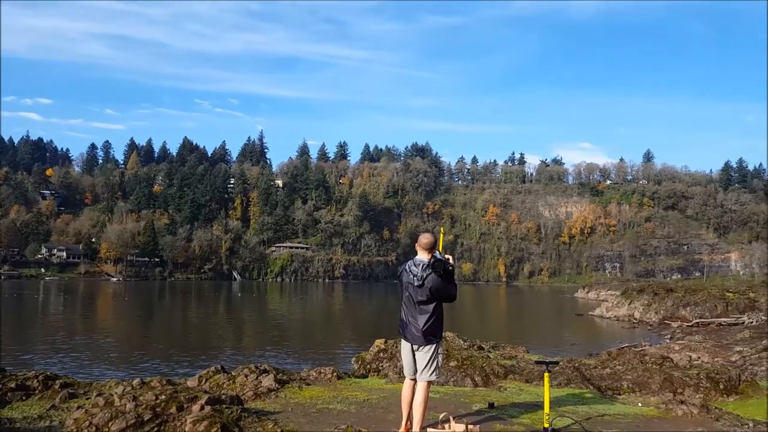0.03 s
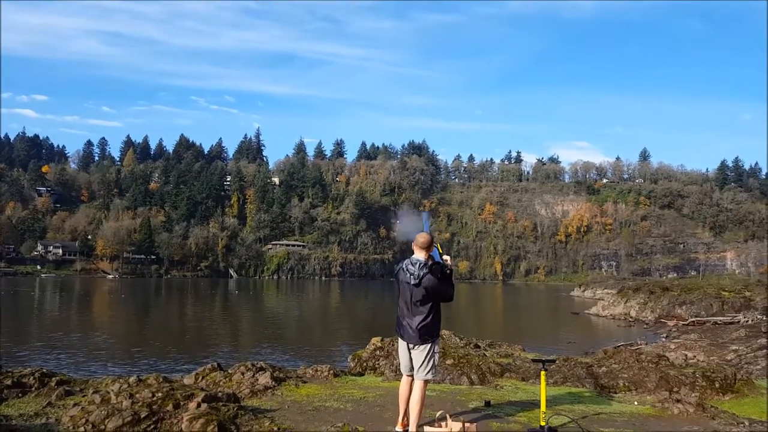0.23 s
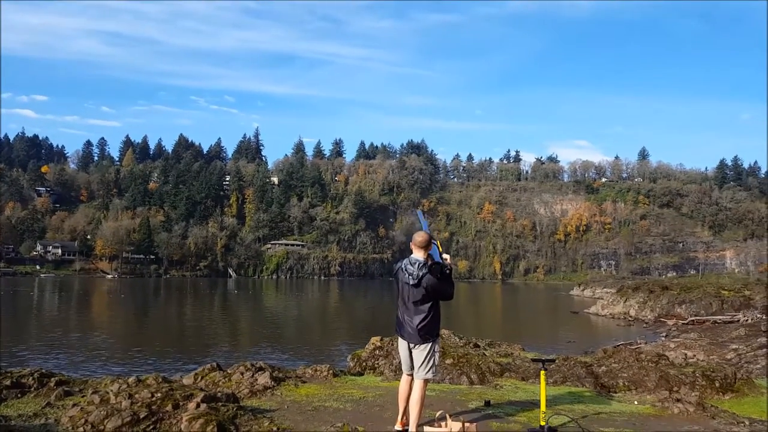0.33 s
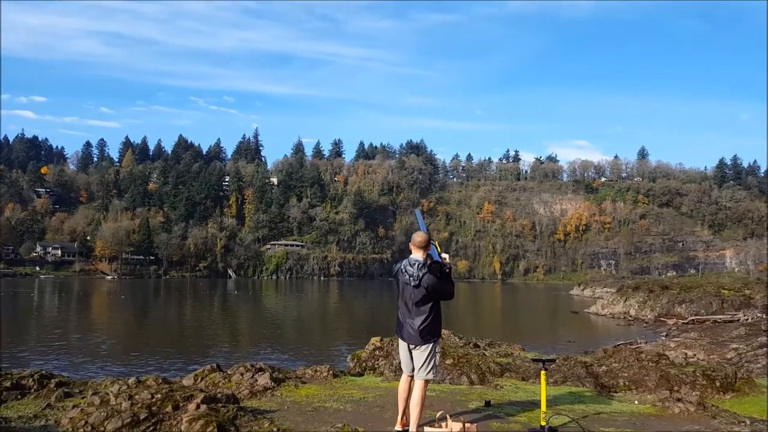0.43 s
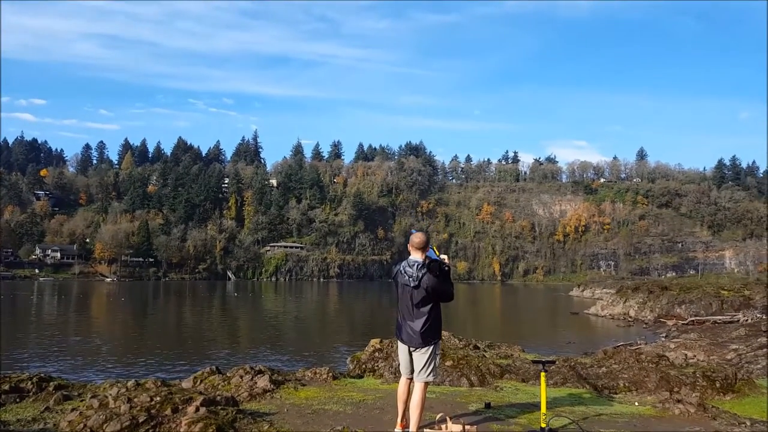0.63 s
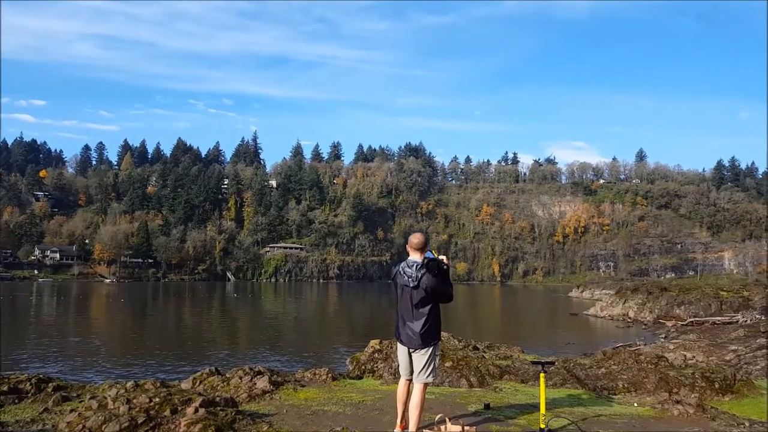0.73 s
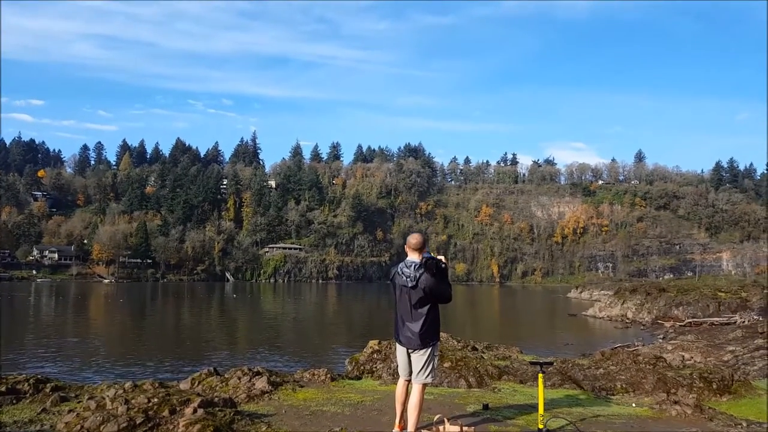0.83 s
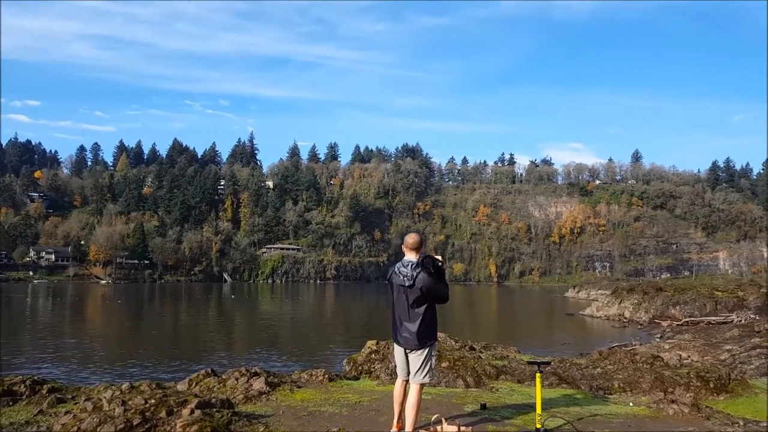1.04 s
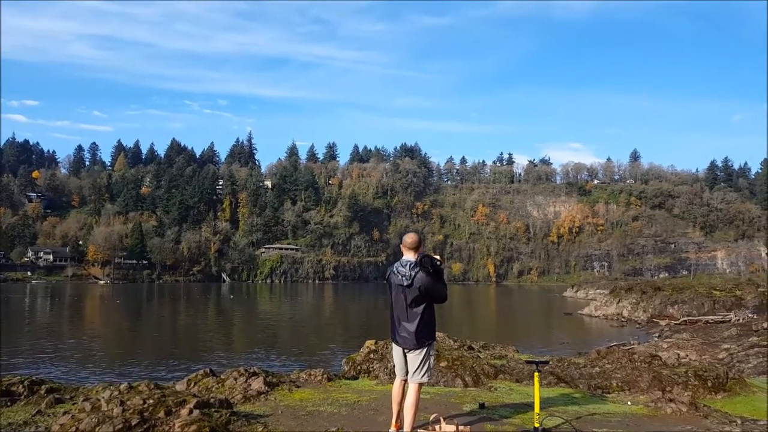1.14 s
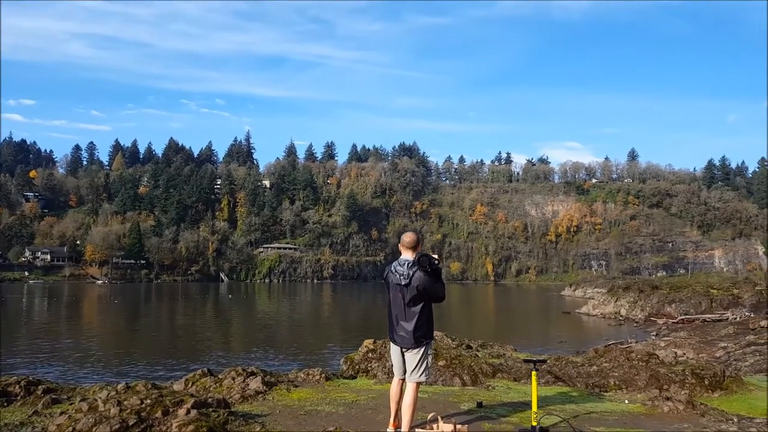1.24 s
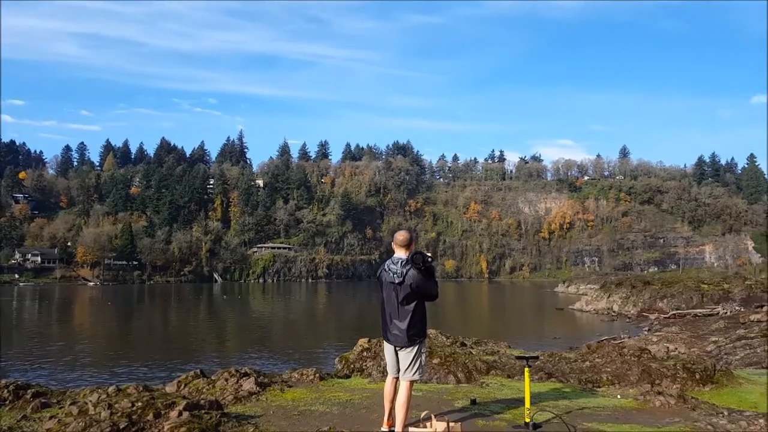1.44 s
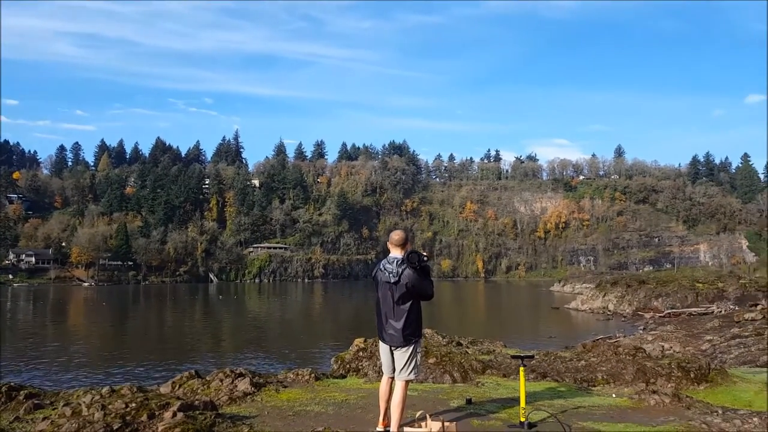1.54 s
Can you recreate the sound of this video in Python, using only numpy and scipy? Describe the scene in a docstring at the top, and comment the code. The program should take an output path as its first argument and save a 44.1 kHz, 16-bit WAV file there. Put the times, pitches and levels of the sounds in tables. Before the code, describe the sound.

A pneumatic launcher fires with a clattering pop and hissing burst, echoing off slopes over faint wind

```python
"""Wind rumble, river wash and a faint hum lie under an air cannon shot on a river bank.
The valve clacks and rattles, air rushes up the barrel, then N-shaped fronts pop at the muzzle.
Ringing pipe sines, a noise jet and buffeting die away; clipping and gain control catch the peak.
Near scatter and slope echoes follow as shaped noise while the ducked background comes back up.
Late on, faint ticks and a rustle sound close by; the rock face returns a clap and a lingering note."""
import sys
import numpy as np
from scipy import signal
from scipy.fft import rfft, irfft
from scipy.io import wavfile
from scipy.ndimage import uniform_filter1d, minimum_filter1d

SR = 44100
rng = np.random.default_rng(int(sys.argv[2]) if len(sys.argv) > 2 else 0)


def file_out(sig):
    """Save sig as 16-bit WAV at sys.argv[1]."""
    # one column per channel
    cols = np.atleast_2d(sig).T
    # limit, then scale
    lim = np.clip(cols, -1, 1)
    pcm = np.round(lim * 32767).astype(np.int16)
    wavfile.write(sys.argv[1], SR, pcm)


N = 70560  # samples, 1.6 s

VALVE_S, MUZZLE_S = 0.1952, 0.2555
# left over right
VALVE_PAN_DB, RUSH_PAN_DB, NEAR_PAN_DB = -1, -1, -1
FAR_PAN_DB, TICK_PAN_DB, AIR_PAN_DB = -1.9, -10, -3


def amp(db):
    """Decibels to amplitude ratio."""
    return 10 ** (np.asarray(db) / 20)


def clock():
    """Sample times in seconds."""
    return np.arange(N) / SR


def bins():
    """Spectrum bin frequencies in Hz, at least 1."""
    return np.maximum(np.arange(N // 2 + 1) * SR / N, 1)


def along_hz(points):
    """A table joined by straight lines on a log-frequency axis."""
    hz, value = np.array(points).T
    return np.interp(np.log(bins()), np.log(hz), value)


def octaves(points):
    """Gain that gives white noise these levels per octave, falling away beyond the ends."""
    f = bins()
    low_end = np.minimum(f / points[0][0], 1) ** 2
    high_end = np.minimum(points[-1][0] / f, 1) ** 2
    per_octave = np.sqrt(SR / 2 / f / np.log(2))
    return amp(along_hz(points)) * low_end * high_end * per_octave


def resonances(modes):
    """Gain of a set of resonances with steep skirts, at unit power."""
    f = bins()
    power = sum(amp(db) ** 2 / (1 + ((f - hz) / width_hz) ** 2) ** 2 for hz, width_hz, db in modes)
    return np.sqrt(power / power.mean())


# stereo width before spread: f/Hz, side over mid/ratio
STEREO_WIDTH = [(31, 0.13), (255, 0.15), (710, 0.42), (1410, 0.96), (2650, 0.81), (5050, 0.82)]


def noise(gain, spread=1):
    """Stereo noise of a given colour, alike in the bass and wide in the treble."""
    mid, side = np.sqrt(N) * np.exp(2j * np.pi * rng.random((2, N // 2 + 1)))
    side = side * along_hz(STEREO_WIDTH) * spread
    return irfft(gain * np.array([mid + side, mid - side]), N)


def ring(modes, full_skew_hz):
    """Steady sines with chance phases, which drift apart between the ears towards the treble."""
    out = 0
    chances = rng.uniform(-np.pi, np.pi, (len(modes), 2))
    for (hz, db), (phase, skew) in zip(modes, chances):
        apart = skew * min(hz / full_skew_hz, 1) * np.array([[0.5], [-0.5]])
        out = out + amp(db) * np.sin(2 * np.pi * hz * clock() + phase + apart)
    return out


def burst(start, rise, hold, t60):
    """Linear attack, hold, exponential release; all in seconds."""
    t = clock() - start
    release = np.maximum(t - rise - hold, 0)
    return np.clip(t / rise, 0, 1) * np.exp(-np.log(1000) * release / t60)


def swell(peak, rise_t60, fall_t60):
    """Exponential growth up to a moment, then exponential decay; all in seconds."""
    t = clock() - peak
    return np.exp(-np.log(1000) * np.maximum(-t / rise_t60, t / fall_t60))


def dull(cut_hz, order=2):
    """Smooth low-pass gain."""
    return 1 / np.sqrt(1 + (bins() / cut_hz) ** (2 * order))


def walk(rate_hz):
    """Twice-smoothed chance with unit spread."""
    k = int(SR / rate_hz)
    w = uniform_filter1d(uniform_filter1d(rng.standard_normal(N), k), k)
    return w / w.std()


def pan(x, db):
    """Level offset between the channels, left over right."""
    return x * amp(np.array([[db], [-db]]) / 2)


# wind rumble before swell: f/Hz, level/(dB per octave)
WIND_BANDS = [(21, -79), (41, -64.5), (71, -48), (112, -49), (205, -52.5), (355, -60), (710, -76)]
# wind swell: t/s, level/dB
WIND_SWELL = [(0, 7.5), (.16, -1.5), (.91, 1), (1.16, 0), (1.36, 0.5), (1.59, 3)]
# distant river wash: f/Hz, level/(dB per octave)
RIVER_BANDS = [(152, -71.5), (405, -63), (710, -59.5), (1410, -62), (2700, -63.5), (3550, -74.5),
               (6050, -80), (10100, -84), (15100, -77.5)]
# far hum: f/Hz, width/Hz, relative level/dB
HUM_MODES = [(657.7, 4.2, -2), (708, 6.3, -12.5), (768, 3.8, -15.5)]
HUM_DB = -63.5


def outdoors():
    """Low wavering noise for wind, mid-band noise for the river, narrow noise bands for the hum."""
    wind_db = np.interp(clock(), *np.array(WIND_SWELL).T) + 1.3 * walk(rate_hz=18)
    wind = noise(octaves(WIND_BANDS)) * amp(wind_db)
    river = noise(octaves(RIVER_BANDS), spread=1.4) * amp(0.51 * walk(rate_hz=10))
    hum = amp(HUM_DB) * noise(resonances(HUM_MODES))
    return wind + pan(river + hum, AIR_PAN_DB)


# close ticks: t/s, level/dB
TICK_TIMES = [(1.1, -54), (1.1188, -62)]


def ticks():
    """Short bursts of resonant noise for dry ticks, a slower one for a brief rustle."""
    colour = resonances([(2600, 480, 1), (4620, 820, -18)])  # f/Hz, width/Hz, relative level/dB
    envelope = amp(-63) * burst(1.145, rise=0.012, hold=0.025, t60=0.06)  # rustle
    for start_s, db in TICK_TIMES:
        envelope = envelope + amp(db) * burst(start_s, rise=0.00071, hold=0.0021, t60=0.025)
    return noise(colour) * envelope


# wooded slopes: t/s, level/dB, rise/s, t60/s, air cut-off f/Hz
SLOPE_ECHOES = [(0.461, -47, 0.0033, 0.35, 12000), (0.57, -52, 0.0087, 0.49, 7100),
                (.66, -62, .03, .9, 10000), (1.091, -66, 0.0094, 0.38, 3550),
                (1.276, -56, 0.011, 0.25, 3050), (1.326, -53, .013, .42, 2900)]
# echo colour: f/Hz, relative level/(dB per octave)
SLOPE_BANDS = [(61, -9), (192, 1.5), (355, -7), (710, 1.5), (1060, -0.5), (1620, -0.5), (2650, 1),
               (3450, -5), (4450, 2.5), (5550, -36), (15100, -22)]
# barrel thump and brightest ring in the nearest echo: f/Hz, width/Hz, relative level/dB
FIRST_ECHO_RESONANCES = [(177, 45, 5), (850, 99, -5.5), (2490, 200, -0.5)]
FIRST_ECHO_S, FIRST_ECHO_DB = 0.463, -36


def slope_echoes():
    """Slopes smear the shot into noise bursts dulled by air; the nearest keeps the barrel's tones."""
    first = noise(resonances(FIRST_ECHO_RESONANCES))
    out = amp(FIRST_ECHO_DB) * first * burst(FIRST_ECHO_S, rise=0.0029, hold=0.016, t60=0.18)
    for start_s, db, rise_s, t60_s, cut_hz in SLOPE_ECHOES:
        smear = noise(octaves(SLOPE_BANDS) * dull(cut_hz), spread=1.8)
        out = out + amp(db) * smear * burst(start_s, rise_s, 0, t60_s)
    return out


# rock face resonances: f/Hz, relative level/dB
CLIFF_RESONANCES = [(640, -5), (790, -12.5), (1020, 0.5), (1230, -9.5), (1480, -1), (1900, 1), (2200, 0),
                    (2620, -10.5), (3180, -6), (3720, -17.5), (4200, -27)]
CLIFF_S, CLIFF_DB, CLIFF_T60_S = 1.2724, -33.5, 0.033
CLIFF_LAG_S = 0.00022  # left behind right


def cliff_echo():
    """The rock face on the right returns a short clap of sines and a lingering note of banded noise."""
    clap = ring(CLIFF_RESONANCES, full_skew_hz=9000)
    clap = clap * burst(CLIFF_S, rise=0.00071, hold=0.003, t60=CLIFF_T60_S)
    clap[0] = np.interp(clock() - CLIFF_LAG_S, clock(), clap[0])
    note = noise(resonances([(1050, 95, 0), (1300, 200, -9)]), spread=1.4)
    note = note * burst(1.282, rise=0.032, hold=0.085, t60=0.16)
    return amp(CLIFF_DB) * clap + amp(-53) * note


# rocks and trees before grain: f/Hz, level/(dB per octave)
SCATTER_BANDS = [(41, -53.5), (92, -51.5), (205, -34.5), (355, -41.5), (810, -41), (1510, -44), (2650, -38),
                 (3450, -48), (4650, -46.5), (6050, -47.5), (9050, -49), (15100, -60.5)]
SCATTER_SPLIT_HZ, SCATTER_T60_S, SCATTER_TREBLE_T60_S = 9300, 1.33, 1.31


def scatter():
    """Many small near-shore reflections as grainy noise; the treble fades slightly faster."""
    grainy = noise(octaves(SCATTER_BANDS), spread=1.35) * amp(1.55 * walk(rate_hz=95))
    spectrum = rfft(grainy)
    low_gain = dull(SCATTER_SPLIT_HZ)
    low = irfft(spectrum * low_gain, N)
    treble = irfft(spectrum * (1 - low_gain), N)
    low_tail = low * burst(MUZZLE_S, rise=0.034, hold=0.04, t60=SCATTER_T60_S)
    return low_tail + treble * burst(MUZZLE_S, rise=0.034, hold=0.04, t60=SCATTER_TREBLE_T60_S)


# valve clack: f/Hz, width/Hz, relative level/dB
VALVE_RESONANCES = [(1383, 420, 5), (1890, 160, 8), (2420, 110, -12), (2850, 370, -1), (4100, 200, -18),
                    (4670, 190, -6), (7100, 510, -12.5)]
# valve body: f/Hz, level/(dB per octave)
VALVE_BODY_BANDS = [(62, -38), (185, -42), (355, -31), (710, -30), (1410, -25), (2650, -23.5),
                    (4050, -33.5), (7050, -35.5), (10100, -42), (15100, -52)]
VALVE_RING_DB, VALVE_RISE_S, VALVE_HOLD_S, VALVE_T60_S = -26.5, 0.00072, 0.0052, 0.062


def valve():
    """The valve slams open and rattles the plastic chamber: resonant plus broad noise bursts."""
    rattle = amp(VALVE_RING_DB) * noise(resonances(VALVE_RESONANCES), spread=0.63)
    rattle = rattle * burst(VALVE_S, VALVE_RISE_S, VALVE_HOLD_S, VALVE_T60_S)
    body = noise(octaves(VALVE_BODY_BANDS), spread=0.75)
    return rattle + body * burst(VALVE_S, VALVE_RISE_S, hold=0.0042, t60=0.072)


# air leaking past the slug: f/Hz, level/(dB per octave)
LEAK_BANDS = [(310, -24.5), (1010, -55), (2550, -46), (4550, -31), (7050, -36.5), (9050, -38.5),
              (11100, -44), (15100, -48)]
# air driving the slug: f/Hz, level/(dB per octave)
GROWL_BANDS = [(31, -52), (82, -30.5), (205, -23.5), (405, -34), (810, -26.5), (1410, -25), (2750, -23.5),
               (3550, -43), (8100, -68)]


def barrel_rush():
    """Air hisses past the slug and growls ever louder as it drives it to the muzzle."""
    opened = np.clip((clock() - VALVE_S) / 0.03, 0, 1)
    hiss = noise(octaves(LEAK_BANDS)) * burst(VALVE_S + 0.017, rise=0.018, hold=0.012, t60=0.085)
    growl = noise(octaves(GROWL_BANDS), spread=0.61)
    growl = growl * swell(MUZZLE_S - 0.002, rise_t60=0.19, fall_t60=0.07)
    return hiss + opened * growl


# open barrel modes: f/Hz, relative starting level/dB
BARREL_MODES = [(202, -14), (265, -17.5), (390, -31), (428, -13), (671, -18.5), (702, -23), (860, -21),
                (1008, -15), (1206, -21.5), (1639, -17), (2205, -21.5), (2299, -15), (2636, -14.5),
                (2903, -30), (4460, -46)]
# turbulent jet before flutter: f/Hz, level/(dB per octave)
JET_BANDS = [(102, -49), (355, -18), (710, -18), (1410, -16), (2750, -11), (3450, -19.5), (4550, -16),
             (5550, -29.5), (8850, -21.5), (10100, -25.5), (15100, -29.5)]
# low buffeting: f/Hz, level/(dB per octave)
BUFFET_BANDS = [(21, -43), (46, -36), (82, -21), (162, -25.5), (240, -22.5), (420, -29.5), (710, -27)]
BARREL_DB, BARREL_T60_S, BARREL_HOLD_S = -0.5, 0.13, 0.016


def exhaust():
    """The emptied barrel rings while a turbulent jet and its low buffeting die away."""
    pipe = amp(BARREL_DB) * ring(BARREL_MODES, full_skew_hz=2600)
    pipe = pipe * burst(MUZZLE_S - 0.0025, rise=0.0016, hold=BARREL_HOLD_S, t60=BARREL_T60_S)
    jet = noise(octaves(JET_BANDS)) * amp(2.1 * walk(rate_hz=370))
    jet = jet * burst(MUZZLE_S - 0.0011, rise=0.0014, hold=0.015, t60=0.13)
    buffet = noise(octaves(BUFFET_BANDS))
    buffet = buffet * burst(MUZZLE_S - 0.0032, rise=0.0042, hold=0.056, t60=0.14)
    return pipe + pan(jet, db=-1) + buffet


# muzzle pop and near reflections: t/s, peak level before colour/dB
SHOCK_FRONTS = [(.2556, 9), (0.2591, 5), (0.2613, 7.5), (0.2673, -1), (0.2763, -3), (0.2788, -2)]
# shock colour: f/Hz, gain/dB
SHOCK_GAINS = [(41, -14), (205, 0.5), (1010, -0.5), (2750, 4.5), (4050, -5), (8100, 1), (15100, -24)]
SHOCK_LENGTH_S, SHOCK_LEFT_LAG_S = 0.00072, 0.000045


def shocks():
    """N-shaped fronts: pressure jumps up, falls linearly below zero and jumps back."""
    out = np.zeros((2, N))
    lag_s = np.array([[SHOCK_LEFT_LAG_S], [0]])
    for start_s, db in SHOCK_FRONTS:
        u = (clock() - start_s - lag_s) / SHOCK_LENGTH_S
        inside = (u >= 0) & (u < 1)
        out += amp(db) * (1 - 2 * u) * inside
    return irfft(rfft(out) * amp(along_hz(SHOCK_GAINS)), N)


def scene():
    """Background, reflections and cannon, each panned."""
    far = pan(scatter() + slope_echoes() + cliff_echo(), FAR_PAN_DB)
    before_pop = pan(valve(), VALVE_PAN_DB) + pan(barrel_rush(), RUSH_PAN_DB)
    shot = pan(shocks() + exhaust(), NEAR_PAN_DB)
    return outdoors() + pan(ticks(), TICK_PAN_DB) + far + before_pop + shot


AGC_TOP_DB, AGC_HOLD_S, AGC_DB_PER_S = -9, 0.5, 18.5
TOP_HZ = 15800


def record(dry):
    """Gain control that drops fast, holds and recovers slowly; clipped peaks; a steep top cut."""
    power = uniform_filter1d(np.mean(dry ** 2, axis=0), size=220)
    level_db = 10 * np.log10(np.maximum(power, 1e-12))
    over_db = np.maximum(level_db - AGC_TOP_DB, 0)
    half_hold = int(AGC_HOLD_S * SR / 2)
    # running maximum over the past hold time
    held_db = -minimum_filter1d(-over_db, 2 * half_hold + 1, origin=half_hold, mode="constant")
    recovery_db = AGC_DB_PER_S * clock()
    cut_db = np.maximum.accumulate(held_db + recovery_db) - recovery_db
    cut_db = uniform_filter1d(cut_db, size=64)
    clipped = np.clip(dry * amp(-cut_db), -1, 1)
    top_cut = signal.ellip(10, 0.2, 80, TOP_HZ, fs=SR, output="sos")
    return signal.sosfilt(top_cut, clipped)


dry = scene()
out = record(dry)
file_out(out)
```